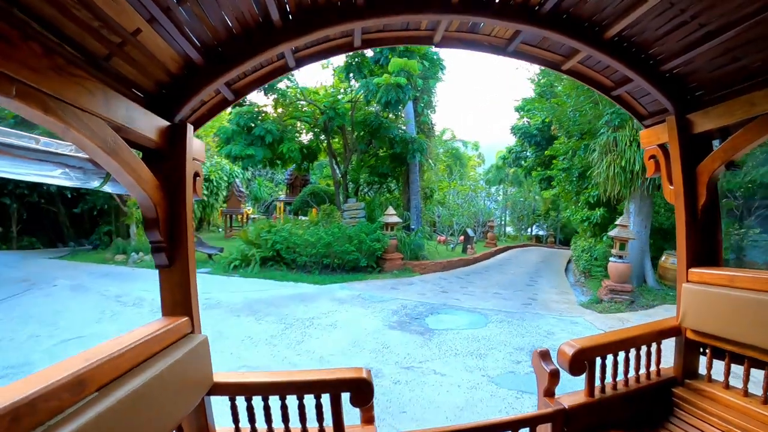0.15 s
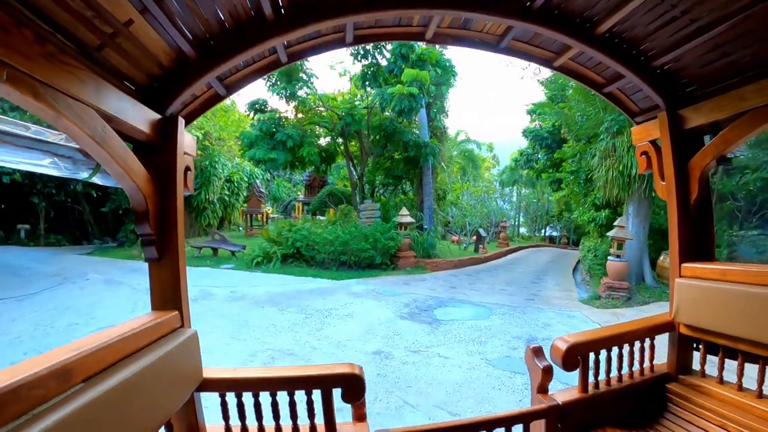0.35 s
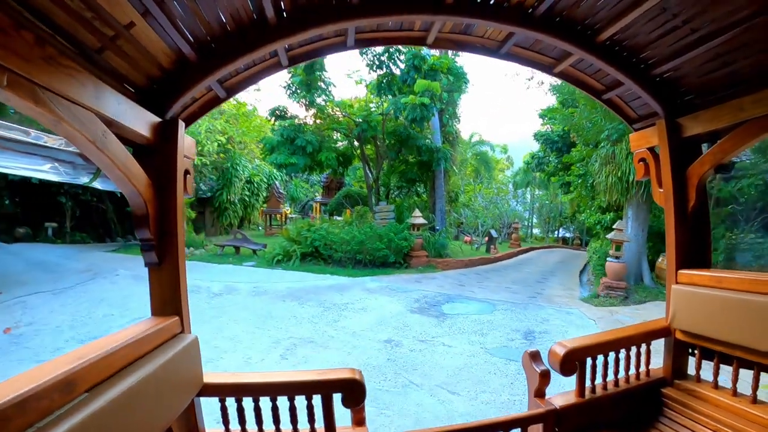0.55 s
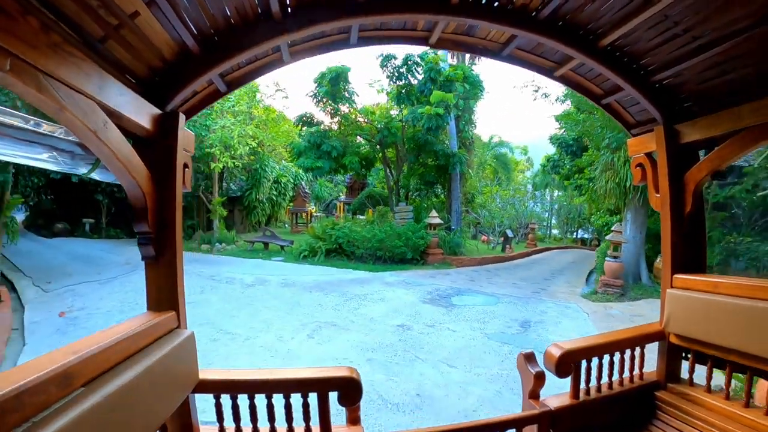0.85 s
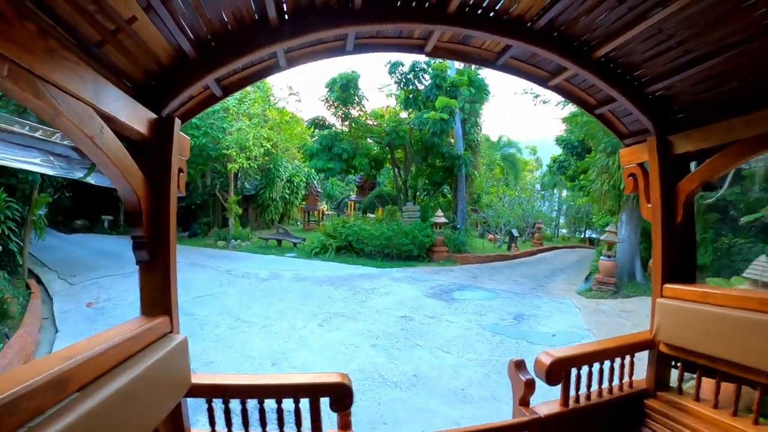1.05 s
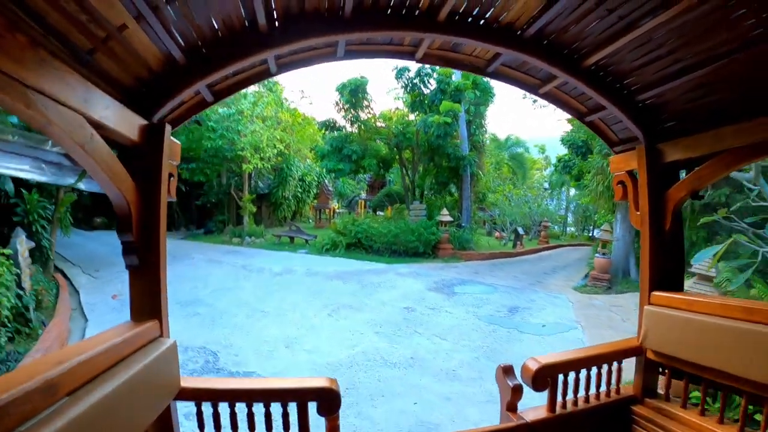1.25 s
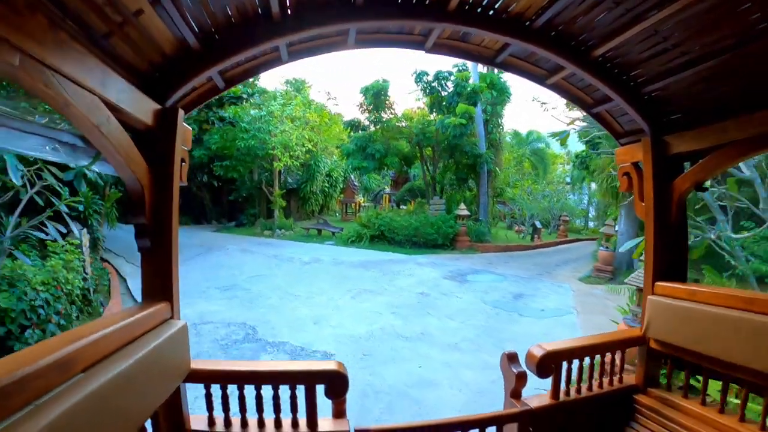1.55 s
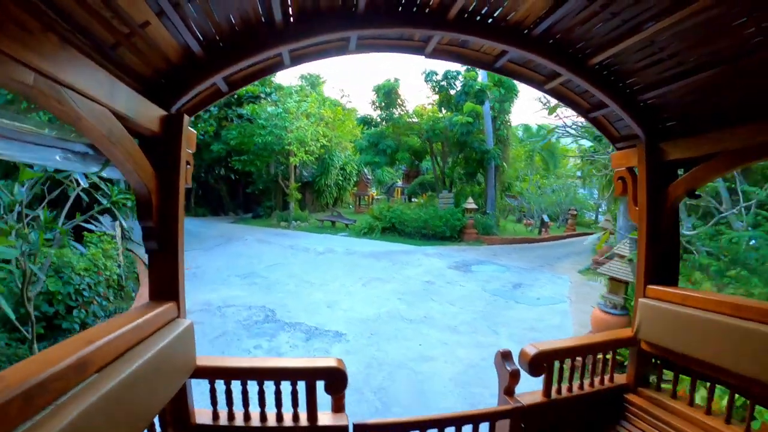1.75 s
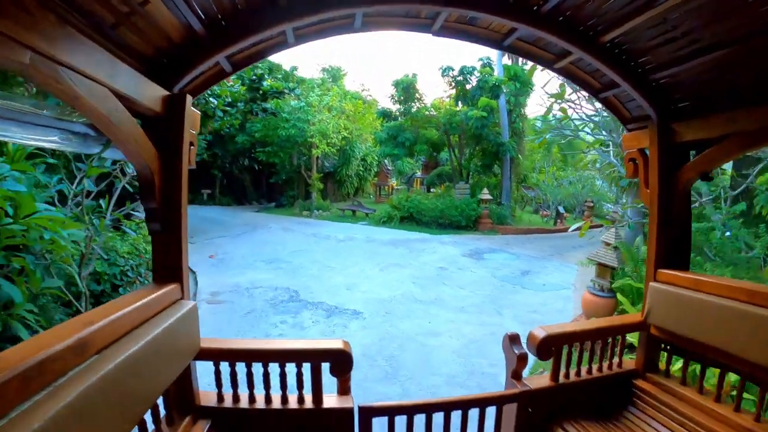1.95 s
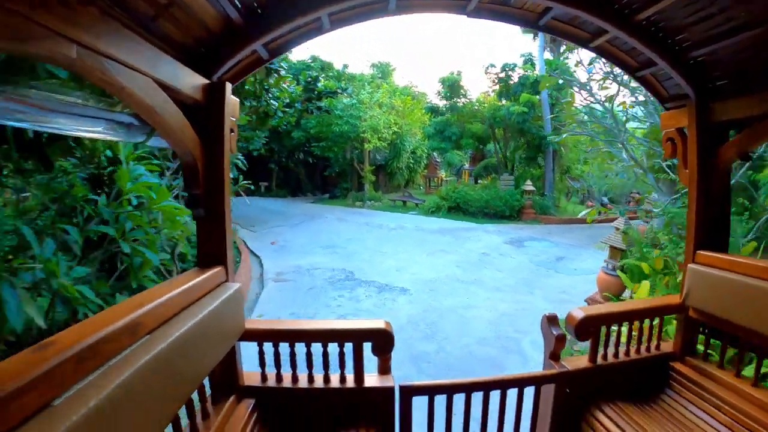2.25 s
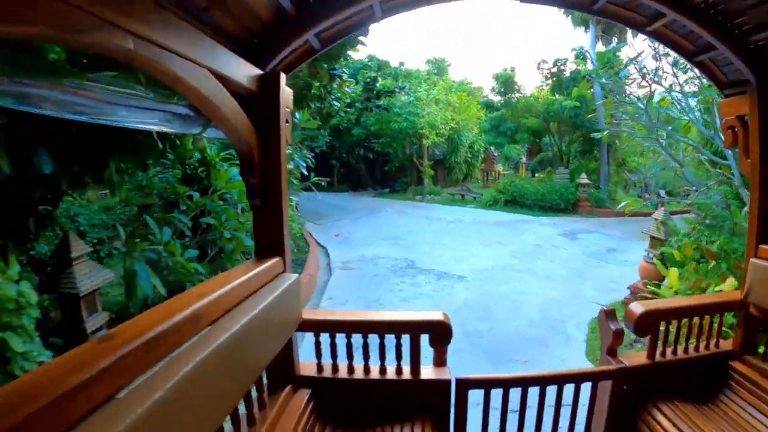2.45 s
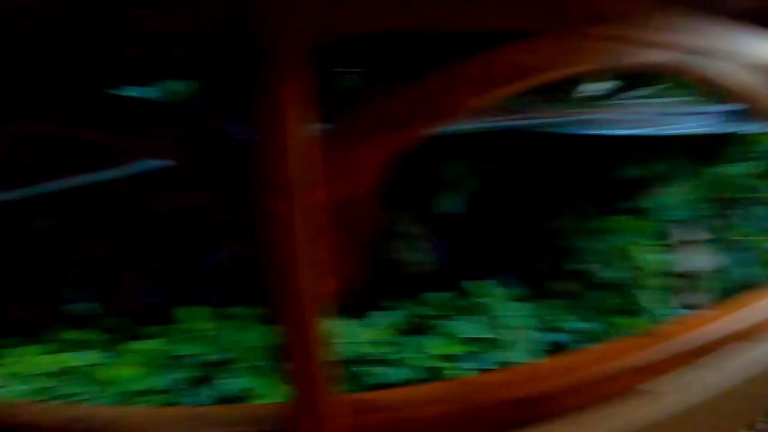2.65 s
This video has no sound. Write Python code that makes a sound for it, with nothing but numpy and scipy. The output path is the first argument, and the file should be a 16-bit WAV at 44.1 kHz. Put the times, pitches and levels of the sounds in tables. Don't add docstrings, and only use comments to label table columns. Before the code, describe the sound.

Low, booming engine drone of a small open cart rolling along, its wooden bench lightly rattling.

```python
import sys
import numpy as np
from scipy import signal
from scipy.fft import rfft, irfft
from scipy.io import wavfile
from scipy.ndimage import uniform_filter1d

SR = 44100
rng = np.random.default_rng(int(sys.argv[2]) if len(sys.argv) > 2 else 0)


def gain_from_db(level_db):
    decades = np.asarray(level_db, float) / 20
    return 10 ** decades


def store_wav(level_fs):
    pcm = np.round(np.clip(np.atleast_2d(level_fs), -1, 1) * 32767)
    wavfile.write(sys.argv[1], SR, pcm.T.astype(np.int16))


N = 123479

# (time [s], firing rate [Hz], boom level [dB])
ENGINE = [(0, 60.56, -20), (0.07, 57.48, -15.5), (0.1, 58.2, -19.5), (0.16, 58.07, -21.5),
          (0.21, 57.7, -18), (0.3, 56.66, -17.5), (0.5, 54.42, -18), (0.7, 55, -18), (0.95, 54.48, -18),
          (1.12, 55.4, -18.5), (1.45, 56.34, -18), (1.7, 55.97, -17.5), (1.85, 58.43, -18),
          (2.03, 56.4, -18), (2.17, 57.82, -18.5), (2.55, 57.34, -18), (2.7, 60.58, -18),
          (2.8, 60.04, -21.5)]
# (time [s], load [dB], exhaust drone [dB])
EFFORT = [(0, 1, 0), (.13, 5, -3), (.24, -6, 4), (.35, 0, 7), (.45, -8, -4), (.6, 3, 1), (.9, 3, -4),
          (1.05, -2, -4), (1.25, 3, -4), (1.4, -6, -3), (1.75, -2, -5), (1.82, 6, 11), (1.95, 2, 7),
          (2.12, -6, 7), (2.3, 6, 11), (2.4, -5, 2), (2.6, 1, 9), (2.8, 5, 13)]
# (time [s], sag of the boom [dB])
STUMBLES = [(.015, -5.5), (.062, -5.5), (.162, -5.5), (.255, -3), (.335, -1.5), (.67, -0.5), (.81, -1),
            (1.075, 0), (1.576, -3.5), (1.68, -3.5), (1.89, -2.5)]
# (multiple of firing rate, level re boom [dB], flicker [dB], share of load, share of drone)
OVERTONES = [(.5, -26, 3, 0, 0), (2, -21, 1.5, 1, 0), (3, -25, 3, 0, -.2), (3.5, -27, 1.5, 0, 1),
             (3.75, -29, 3.5, 0, -.4), (4, -30, 3.5, 0, -.4), (4.5, -38, 3, 0, -.6), (4.75, -36, 3, 0, -.6),
             (6, -32, 3, .2, 0), (6.5, -40, 3, 0, 0), (7.25, -41, 3, 0, 0)]
CYLINDERS = [0.74, 0.37, 1, -0.95]
# (frequency [Hz], width [Hz], level [dB])
PANELS = [(204, 18, -49), (245, 40, -57), (345, 50, -53), (115, 30, -50)]
# (frequency [Hz], level [dB per Hz])
ROAD = [(70, -10), (130, -13.5), (215, -18), (280, -20.5), (750, -31.5), (2860, -44), (6460, -56),
        (14000, -79.5)]
# (frequency [Hz], side re mid [dB])
WIDTH = [(60, -30), (110, -31), (200, -33), (370, -31), (680, -18), (1260, -12), (2310, -9.5), (4250, -5.5),
         (7810, -4.5), (14400, -3.5)]
# (frequency [Hz], share of mid added to side)
LEAN = [(300, 0.0091), (1000, .05), (3000, 0.12), (8000, .03)]
# (time [s], level [dB], rattle length [s], low slat level [dB])
RATTLES = [(0.055, -46.5, 0.043, 8), (0.283, -45, 0.04, 0), (0.349, -37, 0.051, 6), (0.434, -37, 0.035, 3),
           (0.498, -41, 0.045, 5), (0.797, -43, 0.04, -15), (0.86, -48, 0.042, 4), (1.434, -42, 0.036, 2),
           (1.545, -43, 0.044, 11), (1.594, -48, 0.042, 10), (1.814, -46, 0.05, 8), (1.918, -44, 0.042, 5),
           (1.945, -50, 0.03, 11), (2.7317, -44, 0.02, -2.5)]
# (time [s], level [dB])
TAPS = [(0.3552, -36), (0.3708, -35), (0.3802, -39), (0.436, -40), (0.4414, -36), (0.456, -38),
        (0.4804, -49), (0.5006, -42), (0.5184, -40), (0.545, -47), (0.8127, -43), (0.8466, -47),
        (1.4356, -39.5), (1.5354, -44.5), (1.5521, -44), (1.5696, -38.5), (1.5973, -47), (1.8123, -41),
        (1.9164, -41), (1.9304, -44), (1.9551, -45), (2.7347, -36)]
# (frequency [Hz], level [dB], T60 [s])
THIN_SLATS = [(1300, -3, .025), (1420, -2, .04), (1520, 0, .05), (1660, -3, .03), (1820, -4, .025),
              (2350, -7, .02), (3000, -11, .015)]
# (frequency [Hz], level [dB], T60 [s])
LOW_SLAT = [(635, 2, .085), (370, -6, .04), (520, -4, .035), (740, -4, .03), (870, -11, .02),
            (1040, -9, .025)]
# (time [s], level [dB], pan to left [dB], left ear leads by [s], crack level [dB])
KNOCKS = [
    (0.773, -35.5, -4.5, 0.001, -6),
    (0.7775, -35, -4.5, 0.001, 3),
    (2.298, -33, 0, 0, -14),
    (2.679, -38, 0, 0, -5),
]
# (frequency [Hz], level [dB], T60 [s])
POST = [(350, -3, .03), (620, -5, .02), (890, -1, .03), (1040, -1, .022), (1200, -2, .02),
        (1710, -10, .018)]
# (frequency [Hz], level [dB], T60 [s])
CRACK = [(2100, -8, .012), (2950, -9, .012), (3300, -9, .012), (5000, -17, .01)]


def table(rows, at, col=1):
    rows = np.array(rows, float)
    return np.interp(at, rows[:, 0], rows[:, col])


def on_log(rows, hz):
    rows = np.array(rows, float)
    return np.interp(np.log(hz), np.log(rows[:, 0]), rows[:, 1])


def level(x, db):
    return x * gain_from_db(db) / np.sqrt(np.mean(x ** 2))


def resonance(x, hz, width):
    return signal.lfilter(*signal.iirpeak(hz, hz / width, fs=SR), x)


def steep_band(x, hz, width):
    return resonance(resonance(x, hz, width), hz, width)


def low_pass(x, order, hz):
    return signal.sosfilt(signal.butter(order, hz, fs=SR, output="sos"), x)


def shaped(x, gain):
    hz = np.maximum(np.fft.rfftfreq(N, 1 / SR), 1)
    return irfft(rfft(x) * gain(hz), N)


def bump(t, centre, width):
    return np.exp(-.5 * ((t - centre) / width) ** 2)


def walk(rate):
    hold = int(SR / rate)
    held = np.repeat(rng.standard_normal(N // hold + 1), hold)
    return 1.3 * uniform_filter1d(uniform_filter1d(held, hold), hold)[:N]


def ring(x, modes):
    out = 0
    for hz, db, t60 in modes:
        pole = np.exp(2j * np.pi * hz / SR - np.log(1000) / (t60 * SR))
        out = out + gain_from_db(db) * signal.lfilter([1], [1, -pole], x).imag
    return out


def engine(t, turns):
    load_db, drone_db = table(EFFORT, t), table(EFFORT, t, col=2)
    sag_db = sum(db * bump(t, s, .014) for s, db in STUMBLES)
    boom = gain_from_db(sag_db + 0.94 * walk(31)) * np.sin(2 * np.pi * turns)
    for multiple, db, flicker_db, load, drone in OVERTONES:
        effort_db = load * load_db + drone * drone_db
        loudness = gain_from_db(db + 1 + effort_db + flicker_db * walk(14))
        phase = multiple * turns + rng.random() + .03 * walk(9)
        boom = boom + loudness * np.sin(2 * np.pi * phase)

    fired = np.flatnonzero(np.diff(np.floor(turns)) > 0)
    scatter = 0.52 * rng.standard_normal(len(fired))
    pulses = np.zeros(N)
    pulses[fired] = np.resize(CYLINDERS, len(fired)) + scatter
    panels = sum(level(steep_band(pulses, hz, width), db) for hz, width, db in PANELS)
    return np.sqrt(2) * gain_from_db(table(ENGINE, t, col=2)) * boom + panels


def road(t, turns):
    out = 0
    swell_db = .4 * walk(11)
    for hz in 70 * 2 ** np.arange(0, 8, .5):
        def skirt(f):
            octaves = np.clip(np.log2(f / hz), -.5, .5)
            return gain_from_db(on_log(ROAD, f)) * np.cos(np.pi * octaves)

        mid = shaped(rng.standard_normal(N), skirt)
        side = shaped(rng.standard_normal(N), skirt) * gain_from_db(on_log(WIDTH, hz))
        hedge_db = 2.5 * t * hz ** 2 / (hz ** 2 + 8800 ** 2)
        out = out + gain_from_db(hedge_db + swell_db + 1.1 * walk(11)) * np.array([mid, side])
    puff = 1 + .04 * np.cos(2 * np.pi * turns)
    out = out * puff * gain_from_db(-37) / np.std(out[0])

    jolt_db = 9 * bump(t, .08, .07)
    out = out * gain_from_db(0.18 * jolt_db)
    rumble = level(steep_band(rng.standard_normal(N), 37, 25), -38)
    out[0] += gain_from_db(jolt_db) * rumble
    return out


def rattles(t):
    contacts_per_s = 900
    chatter = (rng.random(N) < contacts_per_s / SR) * rng.standard_normal(N)
    thin, low = np.zeros((2, N))
    for s, db, length, low_db in RATTLES:
        after = np.maximum(t - s, 0)
        onset = chatter * np.minimum(after / 0.0063, 1)
        thin_burst = onset * np.exp(-after / max(length, .005))
        low_burst = onset * np.exp(-after / .02)
        thin_burst[int(s * SR)] = .5
        low_burst[int(s * SR)] = 1
        thin += gain_from_db(db - 14) * thin_burst
        low += gain_from_db(db - 7 + low_db) * low_burst
    thin, low = low_pass(np.array([thin, low]), 4, 2740)
    high = ring(thin, THIN_SLATS) + taps()
    thud = ring(low_pass(low, 2, 1100), LOW_SLAT)
    return np.array([high + thud, gain_from_db(-15) * np.roll(high, 40)])


def taps():
    out, length = np.zeros(N), int(.06 * SR)
    push = np.hanning(length // 200) / 6
    push = np.pad(push, (0, length - len(push)))
    for s, db in TAPS:
        detune = 1 + .025 * rng.standard_normal()
        modes = [(hz * detune, mode_db, t60) for hz, mode_db, t60 in THIN_SLATS[1:4]]
        at = int(s * SR)
        out[at:at + length] += gain_from_db(db - 7) * ring(push, modes)
    return out


def knocks(t):
    body, crack = np.zeros((2, 2, N))
    for s, db, pan_db, lead, crack_db in KNOCKS:
        for ear, sign in enumerate((1, -1)):
            at = int((s - sign * lead / 2) * SR)
            push = gain_from_db(db - 2.5 + sign * pan_db / 2) * np.hanning(7) / 3
            body[ear, at:at + 7] += push
            crack[ear, at:at + 7] += gain_from_db(crack_db) * push
    after = t - 2.42
    fade = (after > 0) * np.exp(-np.abs(after) / .008)
    tick = fade * steep_band(rng.standard_normal(N), 5700, 2200)
    left, right = ring(body, POST) + ring(crack, CRACK) + gain_from_db(-60) * tick / .3
    return np.array([left + right, left - right]) / 2


def scene():
    t = np.arange(N) / SR
    turns = np.cumsum(table(ENGINE, t)) / SR
    motor = engine(t, turns)
    mid, side = road(t, turns) + rattles(t) + knocks(t)
    mid, side = mid + motor, side + gain_from_db(-40) * np.roll(motor, 40)
    side = side + shaped(mid, lambda hz: on_log(LEAN, hz))
    return np.array([mid + side, mid - side])


def top_cut(x):
    return signal.sosfilt(signal.butter(12, 14960, fs=SR, output="sos"), x)


def record(dry):
    t = np.arange(N) / SR
    mid, side = (dry[0] + dry[1]) / 2, (dry[0] - dry[1]) / 2
    narrow_db = np.clip(-21.5 * (t - 0.91), -18.5, 0)
    side = side * gain_from_db(narrow_db)
    ceiling = .55
    sound = ceiling * np.tanh(np.array([mid + side, mid - side]) / ceiling)
    hiss = level(steep_band(rng.standard_normal((2, N)), 12500, 4000), -87)
    hiss = hiss * gain_from_db(4.5 * (t - t[-1]))
    return top_cut(sound + hiss)


dry = scene()
out = record(dry)
store_wav(out)
```